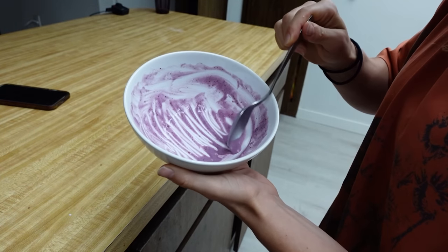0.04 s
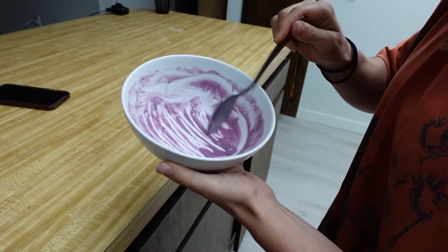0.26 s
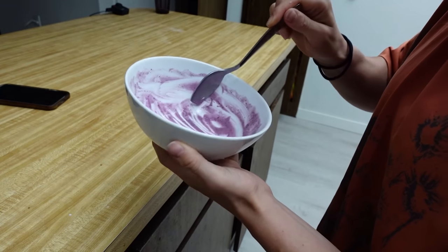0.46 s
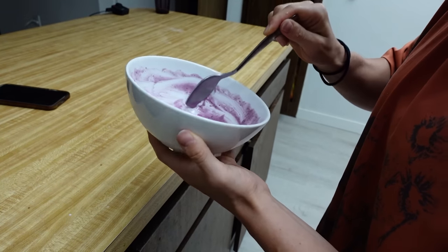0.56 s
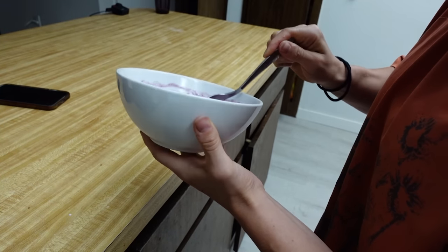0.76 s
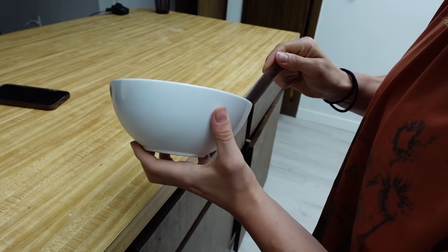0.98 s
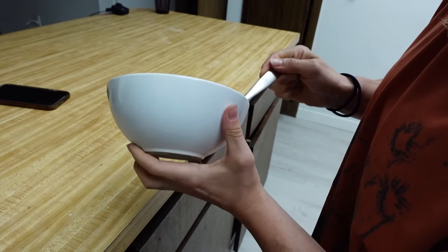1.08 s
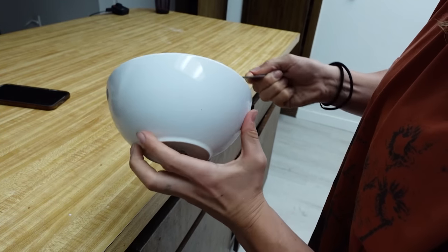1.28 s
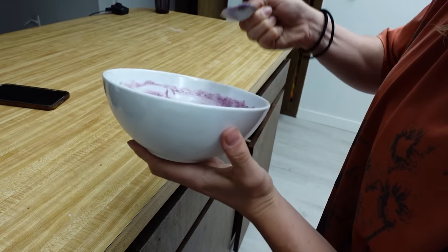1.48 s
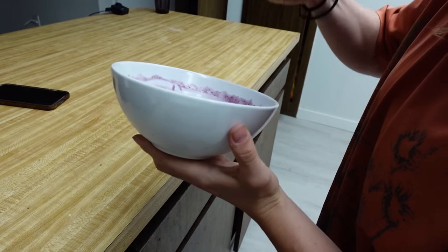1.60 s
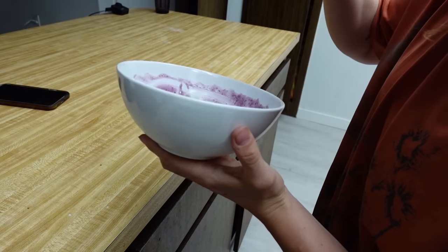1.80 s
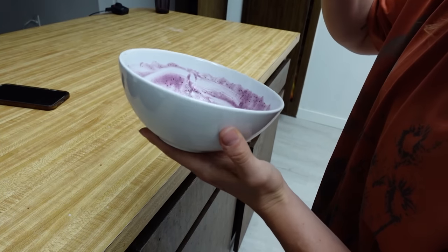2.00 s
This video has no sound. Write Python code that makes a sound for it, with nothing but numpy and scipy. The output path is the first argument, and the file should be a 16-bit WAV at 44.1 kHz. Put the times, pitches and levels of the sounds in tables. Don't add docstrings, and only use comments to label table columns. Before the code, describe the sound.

A spoon in a ceramic bowl, heard close in a quiet, lightly reverberant kitchen. A gritty scrape lasts until 0.1 s, then a hard bright clink at 0.24, a duller rebound at 0.3, light scraping near 0.35, and a ringing clink at 0.55, damped around 0.9. A tick at 1.0, faint squeak at 1.15, tiny wet ticks from 1.3 to 1.55, and a small tap at 2.0, over low fridge hum.

```python
import sys
import numpy as np
from scipy import signal
from scipy.fft import rfft, irfft
from scipy.io import wavfile
from scipy.ndimage import uniform_filter1d

SR = 44100
rng = np.random.default_rng(int(sys.argv[2]) if len(sys.argv) > 2 else 0)


def amplitude_ratio(level_db):
    exponent = np.asarray(level_db, float) / 20
    return 10 ** exponent


def waveform_to_disk(signal):
    frames = np.transpose(np.atleast_2d(signal))
    scaled = np.clip(frames, -1, 1) * 32767
    samples = np.round(scaled).astype(np.int16)
    wavfile.write(sys.argv[1], SR, samples)


N = 90404


def evened(x):
    return x / np.sqrt(np.mean(x ** 2) + 1e-20)


def read(points, hz):
    f, value = np.transpose(points)
    return np.interp(np.log(hz + 1), np.log(f + 1), value)


def add(mix, s, sound):
    part = mix[round(s * SR):][:len(sound)]
    part += sound[:len(part)]


def resonate(x, hz, width):
    carrier = np.exp(2j * np.pi * hz * np.arange(len(x)) / SR)
    r = np.exp(-np.pi * width / SR)
    envelope = signal.lfilter([1 - r], [1, -r], x / carrier)
    return 2 * (carrier * envelope).real


def body(grit, resonances):
    return sum(amplitude_ratio(db) * evened(resonate(resonate(grit, hz, width), hz, 2 * width))
               for hz, width, db in resonances)


def smoothed(x, seconds, rate):
    size = max(int(seconds * rate), 2)
    return uniform_filter1d(uniform_filter1d(x, size), size)


def wander(seconds):
    return evened(smoothed(rng.standard_normal(N), seconds, SR))


def ringing(place, s, peak_db, stretch):
    # (t60 [s], level in clink one [dB], clink two [dB], clink three [dB])
    bowl = [(0.87, -39, -36, -13), (0.2, -0.5, -24.5, -3), (0.18, -29.5, -35, -5.5),
            (0.46, -12.5, -10.5, -8.5), (0.2, -6.5, -35.5, -36), (0.16, -19.5, -41, -19),
            (0.23, -19, -24.5, -11.5), (0.18, -3, -28, 0.5), (0.36, -21, -37, -12.5),
            (0.2, -16.5, -29, -25), (.35, -25, -33, -14), (0.089, 0.5, -21.5, -1.5),
            (0.11, -3.5, -25.5, -6), (0.05, -26.5, -4.5, 3)]
    spoon = [(0.077, -25, -24, -44.5), (0.15, -20.5, -12.5, -10), (0.15, -16, 2, -31),
             (0.12, -17.5, 5, -40), (.2, -29.5, -42.5, -17.5), (0.051, -17, 2, -2),
             (0.2, -17.5, -7.5, -29.5), (0.043, -15.5, -14, -15), (0.11, -25, -29.5, -8),
             (0.06, -25, -29, -8), (0.067, -24.5, -40, -4), (0.18, -17, -18.5, -16.5),
             (.13, -24, -22, -15.5), (.15, -14.5, -15.5, -28)]
    # 977 and 4014 Hz against near partners, 10197 Hz alone
    twins = [(0.67, -17, -40.5, -46.5), (.15, -22.5, -23.5, -12), (0.14, -26.5, -35, -5.5)]
    bowl_hz = [980, 990, 2289, 2309, 2313, 2934, 3775, 4002, 4024, 5545, 5590, 6062, 8396, 10665]
    spoon_hz = [5160, 6750, 6788, 6798, 7316, 8580, 8737, 9096, 9980, 11000, 11850, 12280, 12940, 14860]
    twins_hz = [977, 10197, 4014]
    rise_s, shiver, shiver_s = 0.00031, 0.3, 0.008
    landing_s, landing_db_per_s = 0.427, 300
    grip_s, grip_db_per_s = 0.902, 75

    t = np.arange(SR) / SR
    modes = np.array(list(bowl) + list(spoon) + list(twins))
    hz = np.array(list(bowl_hz) + list(spoon_hz) + list(twins_hz))[:, None]
    sense = np.where(np.arange(len(hz)) < len(bowl) + len(spoon), 1, -1)[:, None]
    t60 = modes[:, :1] * stretch
    db = modes[:, 1 + place, None]

    slow = smoothed(rng.standard_normal((2, len(hz), SR // 20)), shiver_s, SR / 20)
    depth = shiver * hz / 6000 * np.minimum(t / 0.013, 1)
    in_phase, quadrature = np.repeat(evened(slow), 20, axis=2) * depth
    phase = 2 * np.pi * hz * t
    wave = (1 + in_phase) * np.sin(phase) + quadrature * np.cos(phase)
    ring = (sense * amplitude_ratio(db + peak_db - 60 * t / t60) * wave).sum(0)

    landed = np.maximum(s + t - landing_s, 0) * (s < landing_s)
    gripped = np.maximum(s + t - grip_s, 0)
    damping = amplitude_ratio(-landing_db_per_s * landed - grip_db_per_s * gripped)
    return ring * (1 - np.exp(-t / rise_s)) * damping


def knock(crack_db, thud_db):
    t = np.arange(SR) / SR
    noise = rng.standard_normal(SR) * np.exp(-t / 0.0022)
    tilt_db = -0.5 * np.log2((np.arange(SR // 2 + 1) + 200) / 3000)
    crack = irfft(rfft(noise) * amplitude_ratio(tilt_db), SR) * (t < 0.1)
    thud_hz, thud_t60 = 720, 0.0068
    rumble = evened(resonate(rng.standard_normal(SR), thud_hz, 900))
    thud = np.sin(2 * np.pi * thud_hz * t) + 0.3 * rumble
    return amplitude_ratio(crack_db) * 0.29 * crack + amplitude_ratio(-19 + thud_db - 60 * t / thud_t60) * thud


def drag():
    # (time [s], pressure [dB], softness [0-1])
    path = [(0, -35.5, 0.04), (0.018, -44.5, 0.12), (0.028, -42, 0.12), (0.056, -42, 0.1),
            (0.077, -42.5, 0.08), (.088, -72, 0.8), (.2, -74.5, 1), (0.329, -45.5, 0.46),
            (0.401, -48.5, 0.33), (.46, -61.5, 0.35), (0.701, -63.5, 0.78), (0.849, -62, 0.3), (.9, -71, 1),
            (1.081, -67.5, 1), (1.178, -64.5, 0.76), (1.24, -56.5, 1), (1.3, -62.5, 0.93),
            (1.45, -75.5, 0.8)]
    # (frequency [Hz], width [Hz], level [dB])
    rub = [(655, 230, -17), (1270, 470, -15), (2560, 2400, -14.5), (3930, 400, -9), (5000, 3600, -9),
           (6740, 71, -8), (8865, 360, -6.5), (10000, 600, -11.5), (12200, 300, -18.5), (15070, 370, -21)]
    # (frequency [Hz], width [Hz], level [dB])
    smear = [(1033, 200, -2), (2342, 38, -15), (5070, 4800, -6.5), (8414, 370, -20)]
    s, db, soft = np.transpose(path)
    t = np.arange(N) / SR
    soft = np.clip(np.interp(t, s, soft), 0, 1)
    chatter_db, chatter_s = 2, 0.029
    grit = rng.standard_normal(N) * amplitude_ratio(chatter_db * wander(chatter_s))
    edge = (1 - soft) * body(grit, rub)
    underside = soft * body(rng.standard_normal(N), smear)
    return amplitude_ratio(np.interp(t, s, db)) * (edge + underside)


def squeak():
    # (time [s], pitch [Hz], level [dB])
    glide = [
        (1.091, 4180, -74.5),
        (1.12, 4390, -68.5),
        (1.152, 4530, -68.5),
        (1.18, 4790, -63.5),
        (1.196, 5070, -76),
    ]
    s, hz, db = np.transpose(glide)
    t = np.arange(N) / SR
    pitch = np.interp(t, s, hz) * (1 + 0.0027 * wander(0.004))
    level = np.interp(t, s, db, -150, -150) + 1.3 * wander(0.0039)
    return amplitude_ratio(level) * np.sqrt(2) * np.sin(2 * np.pi * np.cumsum(pitch) / SR)


def tick(peak_db, hz, width, length):
    t = np.arange(2000) / SR
    grit = (rng.standard_normal(2000) + 3 * (t == 0)) * np.exp(-(t / length) ** 2)
    out = resonate(grit, hz, width)
    for _ in range(2):
        out = resonate(out, hz, 2 * width)
    return amplitude_ratio(peak_db) * out / abs(out).max()


def catches():
    # (time [s], peak level [dB], width [Hz], length [s])
    slips = [(0.053, -40.5, 120, .012), (.067, -38.5, 120, 0.014), (.038, -47, 77, 0.011),
             (0.032, -46, 79, .014), (0.078, -41, 100, 0.012), (0.055, -50, 64, 0.026),
             (0.036, -36, 140, 0.0081), (.039, -31.5, 140, .006), (.0535, -30, 150, .008)]
    slips_hz = [8915, 8935, 3885, 3950, 6793, 630, 6880, 6880, 6793]
    out = np.zeros(N)
    for (s, db, width, length), hz in zip(slips, slips_hz):
        add(out, s, tick(db, hz, width, length))
    return out


def ticks():
    # (time [s], peak level [dB], pitch [Hz], width [Hz], length [s])
    grains = [(0.475, -34.5, 11000, 5960, 0.002), (0.48, -29.5, 5400, 3100, 0.0026),
              (.517, -51, 11000, 4960, 0.0014), (.518, -44, 3450, 3000, 0.0036),
              (0.755, -46.5, 5750, 1196, 0.021), (0.822, -45, 4420, 2500, 0.0022),
              (0.8398, -40, 3180, 420, 0.0064), (0.841, -58, 9000, 900, 0.011),
              (0.9873, -30.5, 4140, 3430, 0.0014), (0.988, -40.5, 228.4, 64.9, 0.00072),
              (1.3243, -37, 1660, 1150, 0.0015), (1.3272, -40, 3480, 3930, 0.0052),
              (1.378, -56, 11000, 3970, 0.0012), (1.3992, -35, 4880, 1996, 0.00092),
              (1.4008, -37, 7900, 2980, 0.00072), (1.425, -60, 14000, 3030, .001),
              (1.4387, -54, 8240, 5000, 0.00097), (1.4445, -36, 4400, 1580, 0.00081),
              (1.4447, -49, 8400, 4000, 0.00084), (1.4612, -43, 6560, 1500, 0.0008),
              (1.4664, -51, 9500, 7000, .0008), (1.478, -35, 3700, 1280, 0.0017)]
    late = [(1.4805, -52, 6950, 1500, 0.00077), (1.4862, -55, 10500, 4730, 0.0007),
            (1.4917, -48, 6850, 1500, .002), (1.548, -53, 4030, 900, 0.0011),
            (1.915, -57, 7000, 5940, 0.001), (1.9965, -31, 4170, 585, 0.0023),
            (1.9966, -44, 1530, 390, 0.0013), (1.997, -44, 964, 151, 0.0071),
            (1.9963, -49, 2580, 427, 0.0034), (1.999, -47, 6500, 4140, 0.0032)]
    rebounds = [(0.2996, -16, 6200, 3400, 0.008), (.2364, -10, 5200, 1500, .005),
                (0.3031, -23.5, 910, 600, .003), (0.9873, -38.5, 840, 900, 0.0014),
                (1.9975, -45.5, 688, 150, .002), (.554, -25.5, 840, 200, .004),
                (.554, -26.5, 3100, 710, 0.0052), (0.52, -50, 14000, 3000, .001),
                (.491, -57.5, 14000, 3000, .001)]
    fine = [(0.384, -43, 1410, 900, 0.0056), (1.382, -62, 14500, 2500, .0005),
            (1.39, -53, 7000, 2000, .0006), (1.403, -59, 13000, 4000, .0007),
            (1.408, -64, 10000, 2500, .0005), (1.41, -64, 13000, 4000, .0005),
            (1.4185, -62, 13000, 5000, .0005), (1.4414, -46, 7460, 3500, 0.00055),
            (1.445, -59, 14000, 3000, .001), (1.469, -61, 8500, 2000, .0005),
            (1.479, -57, 13030, 4000, .001), (1.491, -61, 12000, 4000, .0006),
            (1.503, -52, 4010, 1500, 0.00088), (1.542, -58.5, 2700, 807, 0.0009),
            (1.93, -56, 6000, 4000, .001), (1.991, -63, 5500, 805, 0.0018), (1.59, -65, 9060, 2490, 0.0011)]
    out = np.zeros(N)
    for s, *burst in list(grains) + list(late) + list(rebounds) + list(fine):
        add(out, s, tick(*burst))
    return out


def afterglow():
    # (frequency [Hz], level [dB], t60 [s])
    remains = [
        (930, -50, 0.22),
        (2350, -59.5, .8),
    ]
    t = np.arange(N) / SR
    return sum(amplitude_ratio(db - 60 * t / t60) * np.sin(2 * np.pi * hz * t) for hz, db, t60 in remains)


def kitchen(x):
    # (frequency [Hz], t60 [s])
    room = [(250, 0.16), (1000, 0.34), (4000, 0.56), (9000, 0.35), (15000, 0.23)]
    first_echo_s = 0.0028
    taps = np.zeros(SR)
    at = np.arange(0, SR - 20, 20) + rng.integers(0, 20, SR // 20 - 1)
    taps[at] = rng.choice([-1., 1.], at.shape)
    taps[:int(first_echo_s * SR)] = 0
    hz, t, z = signal.stft(taps, SR, nperseg=256)
    decay = amplitude_ratio(-60 * t / read(room, hz)[:, None])
    tail = signal.istft(z * decay, SR, nperseg=256)[1]
    return signal.fftconvolve(x, tail / np.linalg.norm(tail))[:N]


def air():
    # (frequency [Hz], density [dB per Hz])
    spectrum = [(15, -41), (25, -21.5), (326, -2.5), (451, -3.5), (516, -8), (775, -12), (936, -21),
                (1160, -18), (16000, -35)]
    # (frequency [Hz], rms level [dB])
    lines = [(59, -90), (118, -77.5), (177, -72), (220.7, -72), (357, -81.5), (446.8, -76), (710.6, -78.5),
             (769.8, -74.5), (1184, -78.5), (2013, -84)]
    t = np.arange(N) / SR
    shape = amplitude_ratio(read(spectrum, np.fft.rfftfreq(N, 1 / SR)))
    hiss = irfft(rfft(rng.standard_normal(N)) * shape, N)
    hum = np.zeros(N)
    for hz, db in lines:
        level = amplitude_ratio(db - 2.5 * wander(0.026))
        hum += level * np.sqrt(2) * np.sin(2 * np.pi * (hz * t + rng.random()))
    return amplitude_ratio(-64) * evened(hiss) + hum


def scene():
    # (time [s], peak level [dB], decay stretch [ratio], crack level [dB], thud level [dB])
    clinks = [
        (.2364, -15.5, 0.76, -1.5, -10.5),
        (.2996, -22.5, 0.9, -14.5, -4),
        (.554, -22.5, 1, -5, -31.5),
    ]
    near, rings = drag() + squeak(), afterglow()
    for place, (s, peak_db, stretch, crack_db, thud_db) in enumerate(clinks):
        add(rings, s, ringing(place, s, peak_db, stretch))
        add(near, s, knock(crack_db, thud_db))
    wet = amplitude_ratio(-5) * kitchen(near + amplitude_ratio(-6) * rings)
    small = ticks() + catches()
    close = near + rings + wet + small + amplitude_ratio(-17.5) * kitchen(small)
    low_cut = signal.butter(2, 290, "high", fs=SR, output="sos")
    return (signal.sosfilt(low_cut, close) + air())[None]


def band_limit(x):
    return signal.sosfilt(signal.butter(12, 16950, fs=SR, output="sos"), x)


def record(dry):
    low_pass = signal.firwin(255, 15900, window=("kaiser", 7), fs=SR)
    mix = signal.oaconvolve(dry, low_pass[None], "same")
    return band_limit(mix)


dry = scene()
out = record(dry)
waveform_to_disk(out)
```